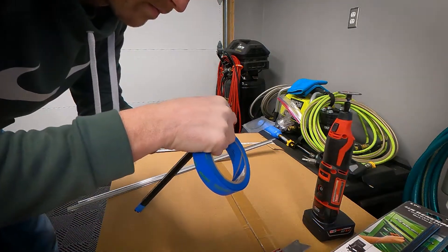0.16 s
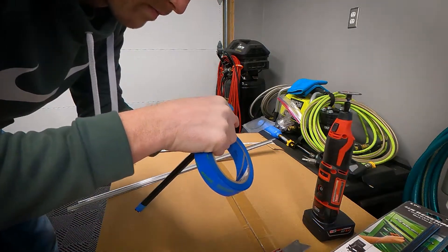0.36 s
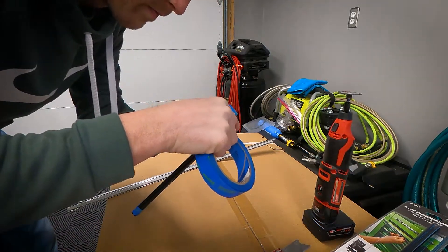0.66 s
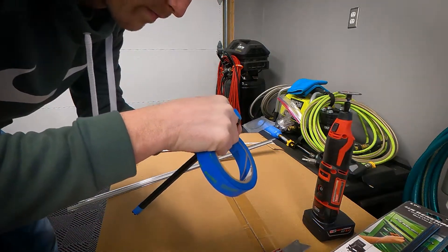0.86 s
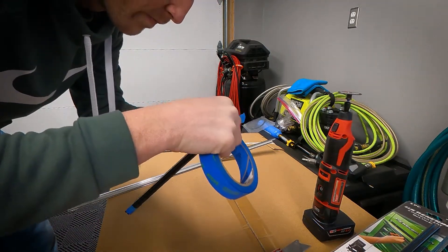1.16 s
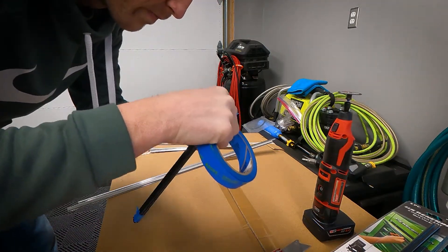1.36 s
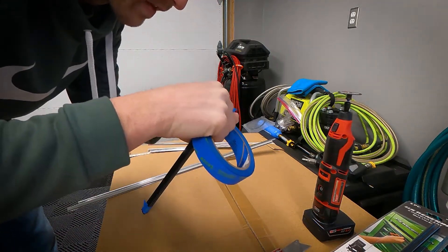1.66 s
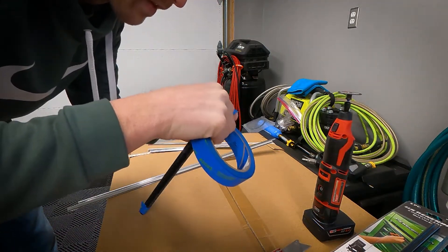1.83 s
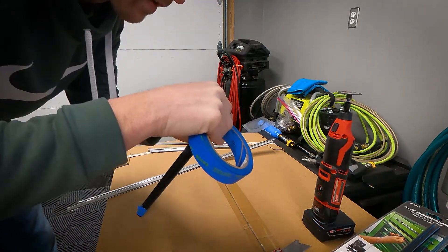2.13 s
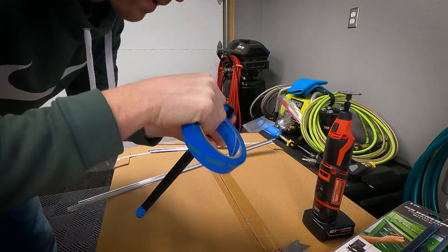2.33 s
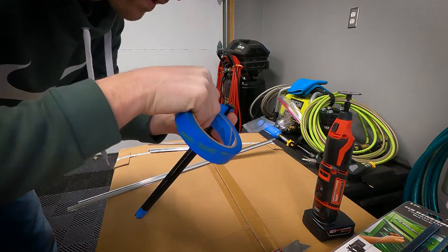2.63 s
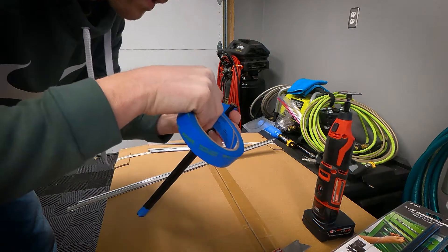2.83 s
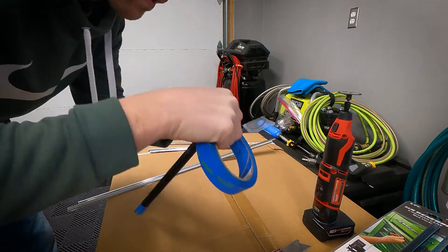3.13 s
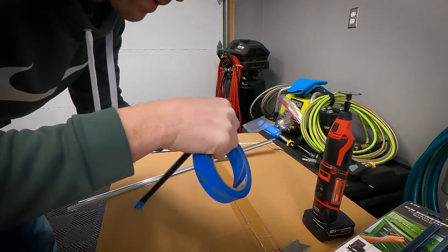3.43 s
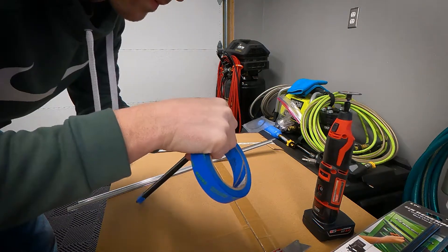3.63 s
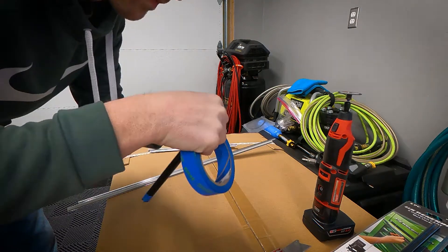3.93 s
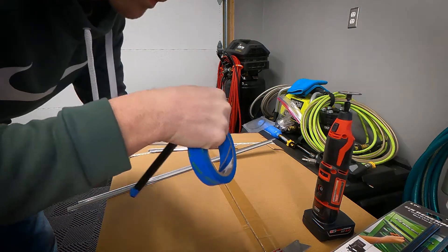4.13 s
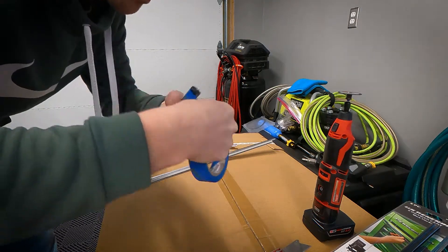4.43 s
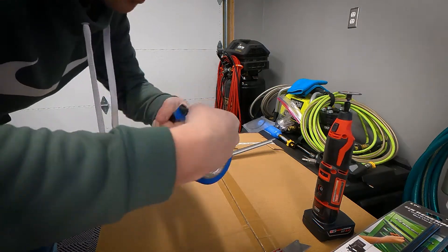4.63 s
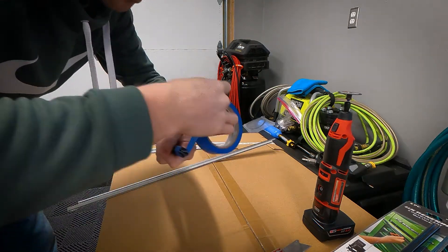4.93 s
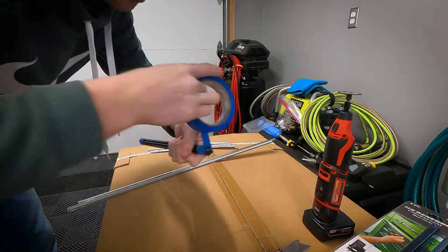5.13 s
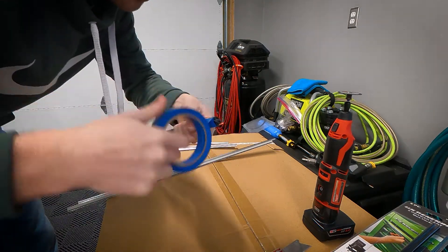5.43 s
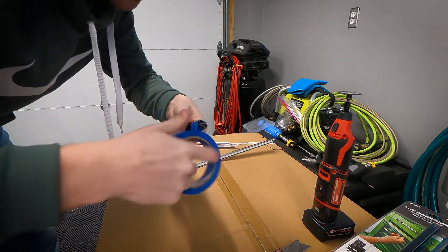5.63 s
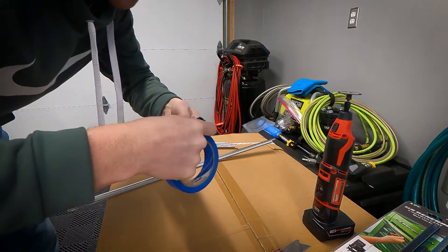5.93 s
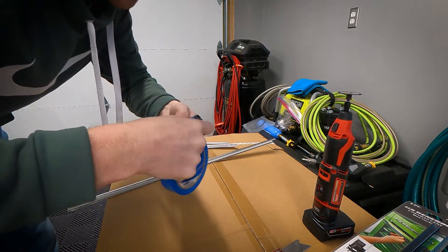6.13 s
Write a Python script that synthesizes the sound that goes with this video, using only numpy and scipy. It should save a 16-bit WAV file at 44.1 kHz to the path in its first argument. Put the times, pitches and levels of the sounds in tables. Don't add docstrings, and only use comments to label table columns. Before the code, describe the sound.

Close, bright tape snaps and fine sticky crackle, mixed with hollow cardboard knocks and juddering scrapes in a live garage, then quiet peeling.

```python
import sys
import numpy as np
from scipy import signal
from scipy.fft import rfft, irfft, next_fast_len
from scipy.io import wavfile
from scipy.ndimage import uniform_filter1d

SR = 44100
rng = np.random.default_rng(int(sys.argv[2]) if len(sys.argv) > 2 else 0)


def rack_gain(trim_db):
    fader = np.asarray(trim_db, float)
    return 10 ** (fader / 20)


def inscribe(sig):
    pcm = np.round(np.clip(np.atleast_2d(sig).T, -1, 1) * 32767)
    wavfile.write(sys.argv[1], SR, pcm.astype(np.int16))


N = 276948

# pitch_hz, level_db, t60_s
LID = [(38.5, -12, 0.15), (72.5, 0.5, 0.13), (125, -7, 0.2), (160.34, 2, 0.176), (215.4, -8.5, 0.11),
       (290.4, -12.5, 0.12)]


def peel():
    # peak_s, crackle_db, rise_s and fall_s per 20 dB, web_pitch_hz
    tugs = [(.136, -69.5, -1, 0.0659, 5500), (.64, -71, 0.3355, 0.12, 4794),
            (.92, -66.5, 0.1451, 0.04, 4700), (1.14, -57.5, -0.03, 0.77, 4150),
            (1.34, -56.5, 0.1783, -0.32, 3903), (1.516, -54.5, 0.0383, 0.27, 3500),
            (1.93, -67, 0.14, 0.85, 4200), (2.158, -71, 0.5, -0.7, 4002), (2.454, -47, 0.0245, 0.158, 5700),
            (2.7, -64, 0.55, 0.39, 5095), (2.75, -50, 0.0647, 0.1923, 4201),
            (3.29, -62, 0.13, 0.1926, 4800), (3.48, -56.5, 0.0235, 0.47, 4194),
            (3.78, -50.5, 0.1657, 0.0489, 5677), (3.9, -79, -2, -1, 4300),
            (4.365, -61.5, 0.0228, 0.19, 5202), (4.44, -46.5, 0.083, 0.0957, 4660),
            (4.51, -54, -0.0575, 0.1821, 4294), (4.8, -62.5, 0.1045, 0.85, 4200),
            (5.326, -62.5, 0.52, 0.2122, 4890), (5.528, -67, -0.15, 0.03, 5700),
            (5.756, -68, 0.21, -0.05, 5606), (6.044, -60.5, 0.16, 0.98, 5387),
            (6.19, -54, 0.0464, -0.14, 5000), (6.255, -53.5, 0.2618, .03, 4400)]
    # freq_hz, level_db per Hz
    web_spectrum = [(1650, -21), (2800, -6), (4040, -4), (4450, -5.5), (5310, -1), (7500, -1.5),
                    (9130, -7.5), (10000, -59.5), (13000, -49.5), (22000, -120)]
    # freq_hz, level_db per Hz
    fizz_spectrum = [(4710, -41.5), (8000, 2), (10500, 3.5), (12600, 2.5), (14600, -6.5), (15800, -21),
                     (16400, -32)]
    fizz_db, fizz_growth = -18, 0.27
    gain, hz = swells(tugs)
    slips = crackle(9000, 2.5, 1.2, 0.0041)
    web = coloured(slips, web_spectrum)
    fundamental = evened(twice(web, hz, 1100))
    overtone = evened(twice(web, np.minimum(1.29 * hz, 7800), 970))
    web = evened(web + 0.6 * fundamental + 0.19 * overtone)
    fizz_gain = rack_gain(fizz_db) * (gain / rack_gain(-60)) ** fizz_growth
    return gain * (web + fizz_gain * coloured(slips[::-1], fizz_spectrum))


def snaps():
    # time_s, peak_db, web_pitch_hz, roll_db re peak, roll_pitch_hz
    events = [(0.0406, -47, 4680, -17, 1280), (0.1753, -49.5, 6610, -27, 1580),
              (0.6823, -52.5, 6590, -21, 1030), (1.1305, -26, 4020, -17, 1740),
              (1.3677, -39.5, 2730, -9.5, 1136), (1.4824, -37, 3330, -14.5, 1730),
              (1.9061, -49.5, 2480, 0, 2450), (1.9131, -37.5, 2400, -15, 2190),
              (2.143, -34.5, 4095, -41, 1000), (2.3984, -45.5, 2760, -20, 2150),
              (2.4096, -8.5, 5686, -36.5, 2460), (2.713, -37, 3680, -13.5, 2260),
              (2.72, -13, 6560, -27.5, 1316), (2.801, -34.5, 3927, -14, 1260),
              (3.3198, -29.5, 3530, -6, 1591), (3.465, -25.5, 3440, -3, 1660),
              (3.7114, -58, 3430, 6.5, 1100), (4.4224, -36, 4024, -11.5, 1644),
              (4.4425, -35, 4140, -4.5, 2120), (4.457, -32, 3730, -8, 1293), (4.4916, -27, 3230, 3.5, 1310),
              (4.7765, -32.5, 4870, -5, 1303)]
    return dulled(slip_clusters(events, rise_s=.0003, fall_s=0.002797, fizz_db=-55.5), 10500)


def rips():
    # time_s, peak_db, web_pitch_hz, roll_db re peak, roll_pitch_hz
    events = [
        (0.0595, -47.5, 5010, -12.5, 1100),
        (1.3386, -42, 3980, -20.5, 2540),
        (1.721, -38, 3470, -11, 2326),
        (2.986, -47.5, 3570, -10.5, 1190),
        (4.7751, -35.5, 4456, -14, 1285),
    ]
    return slip_clusters(events, rise_s=0.015, fall_s=0.0197, fizz_db=-27.5)


def flicks():
    # time_s, peak_db
    events = [
        (1.1308, -44.5),
        (1.682, -38),
        (1.785, -52),
        (1.9135, -50.5),
        (2.4095, -27),
        (2.72, -24),
        (2.801, -39.5),
        (4.4914, -40.5),
        (4.7765, -57.5),
    ]
    # web_pitch_hz, roll_db, roll_pitch_hz
    colour = (13400, -63, 1500)
    rows = [(s, db, *colour) for s, db in events]
    return slip_clusters(rows, rise_s=0.00047, fall_s=.0025, fizz_db=4)


def slip_clusters(rows, rise_s, fall_s, fizz_db):
    out, t = np.zeros((2, N + 2000)), np.arange(2000) / SR
    draws = rng.standard_normal((len(rows), 2000))
    rise = np.minimum(t / rise_s, 1) ** 2
    shape = rise * np.exp(-(np.maximum(t - rise_s, 0) / fall_s) ** 2)
    click = signal.unit_impulse(2000)
    for (s, db, *colour), z in zip(rows, draws):
        near = ringing(z * abs(z) ** 0.51 * shape, *colour, fizz_db)
        near = rack_gain(db) * near / abs(near).max()
        sent = evened(ringing(click, *colour, fizz_db)) * np.std(near)
        out[:, round((s - rise_s) * SR):][:, :2000] += [near, sent]
    return out[:, :N]


def ringing(slips, web_hz, roll_db, roll_hz, fizz_db):
    web = twice(slips, web_hz, 1700) + .3 * twice(slips, 4467, 4800)
    web = twice(web, 6350, 12000)
    roll = twice(slips, roll_hz, 430) + .5 * twice(slips, 1816, 1680)
    return web + rack_gain(roll_db + 19.5) * roll + rack_gain(fizz_db) * twice(slips, 10700, 4500)


def creases():
    # peak_s, level_db, rise_s and fall_s per 20 dB, pitch_hz
    folds = [(.61, -81, 0.77, 1, 1381), (.87, -78.5, 0.23, 1, 1303), (1.15, -74.5, -0.4, 1.77, 1700),
             (1.35, -67.5, 0.16, 0.18, 2398), (1.946, -65.5, 0.036, 0.28, 2358),
             (2.1, -69.5, 0.24, -0.03, 2102), (2.75, -68, -0.5, -0.2, 1272), (3.3, -70, .04, -0.2, 1598),
             (3.36, -67.5, -0.19, 0.5, 1600), (4.425, -55.5, 0.036, 0.1081, 1799),
             (4.51, -78.5, -0.86, 1.5, 1550), (4.86, -70, -1.5, 1.72, 1443), (6.272, -66, 0.05, 2.5, 2300)]
    slips = crackle(5000, 2.5, 2, .008)
    wide = evened(twice(slips, 1850, 1700))
    gain, hz = swells(folds)
    return gain * evened(1.7 * wide + evened(resonate(wide, hz, 300)))


def drag():
    # peak_s, drag_db, rise_s and fall_s per 20 dB
    strokes = [(.002, -41.5, 0.67, 0.0274), (.9, -70, 0, 0.5), (1.372, -52, -0.11, .5),
               (1.56, -54.5, -0.12, 0.95), (2.08, -67, 2.5, -2), (2.25, -68, 0, -7),
               (2.41, -45, -0.1522, 0.2363), (2.76, -40.5, 0.0217, 0.155), (2.935, -48, -0.225, 0.2176),
               (3.655, -51.5, 0.08, 0.55), (3.807, -53, 0.36, 0.85), (3.91, -51, 0.07, 0.17)]
    # time_s, level_db
    loads = [
        (1.03, -68),
        (1.371, -42),
        (2.1, -66),
        (2.145, -37),
        (2.411, -45.5),
        (2.775, -49),
        (3.466, -32),
        (3.72, -56),
        (3.81, -56.5),
    ]
    # time_s, rms_db, length_s, brightness_db
    judders = [(0.228, -63.5, 0.031, 12), (0.531, -65.5, 0.0254, 11.5), (0.612, -57, 0.0325, 6),
               (0.684, -63, 0.016, 2.5), (0.881, -60, 0.0293, 9.5), (1.49, -44.5, 0.0097, 11),
               (1.527, -39.5, 0.0178, 6), (1.571, -54, 0.0303, 17), (1.608, -45.5, 0.0131, 7.5),
               (1.631, -52, 0.0377, -6.5), (2.204, -49.5, 0.0082, 2), (2.794, -47.5, 0.0066, 5.5),
               (2.843, -53, 0.016, -9), (3.547, -42, 0.015, -0.5), (3.568, -41.5, 0.0127, 8.5),
               (3.595, -44, 0.0132, 13.5), (3.623, -40.5, 0.0113, 11), (3.67, -48.5, 0.0075, 11),
               (3.73, -41.5, 0.0222, -1.5), (3.766, -43, 0.0148, 16), (3.788, -40.5, 0.0116, 11.5),
               (3.865, -41.5, 0.0115, 9.5), (3.91, -42.5, 0.0253, 13), (3.949, -48, 0.0337, 13.5),
               (3.988, -45, 0.0118, 13.5), (4.01, -38, 0.00747, 12), (4.034, -37, 0.0083, 11.5)]
    # freq_hz, level_db per Hz
    card_spectrum = [(120, -35.5), (200, -17.5), (308, -11.5), (388, 0.5), (446, 1), (540, -2), (680, -4.5),
                     (1040, -10.5), (1400, -8), (2200, -24.5), (2860, -44.5), (4840, -120)]
    # freq_hz, level_db per Hz
    grit_spectrum = [(1290, -24.5), (2200, -8), (3770, -4), (4770, -7), (5780, -4), (8060, -10.5),
                     (10300, -25), (12000, -23), (15600, -55), (22000, -120)]
    land_s, ease_s = 0.0048, 0.1165
    slips = crackle(2500, 3, 1.5, .005)
    card, grit = coloured(slips, card_spectrum), coloured(slips, grit_spectrum)
    lid = evened(signal.oaconvolve(slips, ring(LID[1:3], .4))[:N])
    rub = swells(strokes)[0]
    weight = swells([(s, db, land_s, ease_s) for s, db in loads])[0]
    out = rack_gain(-12.5) * rub * (card + rack_gain(-11.0) * grit) + rack_gain(-1.5) * weight * lid
    t = np.arange(N) / SR
    for s, db, seconds, bright_db in judders:
        near = slice(round((s - .1) * SR), round((s + .1) * SR))
        shape = np.exp(-((t[near] - s) / seconds) ** 2)
        out[near] += rack_gain(db - 2.0) * shape * (card[near] + rack_gain(bright_db - 19.5) * grit[near])
    return out


def chirrs():
    # time_s, rms_db, length_s, pitch_hz
    events = [(.041, -62, 0.0039, 1288), (.213, -65, 0.0056, 697), (0.495, -72, .008, 1302),
              (1.2, -65, 0.106, 3950), (1.336, -58, .01, 3950), (1.452, -66.5, 0.0079, 2500),
              (1.484, -58.5, .012, 1802), (1.518, -54.5, 0.018, 1784), (1.519, -56.5, 0.0258, 3310),
              (1.583, -55.5, 0.016, 3756), (1.596, -58, .008, 5100), (1.601, -51, .012, 814),
              (1.718, -53, .006, 2400), (1.721, -56, 0.011, 1060), (1.747, -54.5, .004, 5700),
              (2.452, -49, .065, 5700), (2.729, -49.5, 0.0149, 810), (2.78, -55, .05, 3300),
              (2.947, -63, 0.027, 3550), (3.47, -45, .012, 720), (3.522, -62.5, 0.043, 7700),
              (3.561, -53.5, 0.0098, 3100), (3.563, -53.5, 0.0085, 5320), (3.597, -51, 0.0133, 3690),
              (3.618, -47, 0.0083, 1310), (3.62, -51, .006, 6000), (3.764, -45, .02, 5950),
              (3.787, -53.5, .006, 7500), (3.857, -50, .012, 797), (3.9, -52.5, .01, 2910),
              (3.906, -53.5, .015, 6090), (3.984, -55, 0.0063, 3110), (4.004, -53.5, 0.0063, 3900),
              (4.032, -49.5, 0.0096, 5770), (4.39, -59, .025, 5400), (4.417, -52, 0.0312, 1800),
              (4.422, -52.5, 0.0084, 3980), (4.44, -54.5, 0.0164, 4100), (4.597, -61, 0.026, 2210),
              (5.472, -61.5, 0.0049, 3096), (5.532, -68, 0.0197, 7500), (5.707, -68, 0.028, 4983),
              (5.756, -71.5, 0.0107, 10500), (5.985, -69, 0.0207, 2450), (6.069, -67.5, 0.039, 3930),
              (6.189, -56, 0.019, 5520), (6.2, -64, 0.021, 2503), (6.216, -58, 0.0062, 4200),
              (6.234, -53, 0.0132, 4110), (6.248, -61, 0.0154, 2510)]
    rise, width = .4, 0.1785
    slips = crackle(2500, 3, 1.5, .005)
    out, t = np.zeros(N), np.arange(N) / SR
    for s, db, seconds, hz in events:
        near = slice(max(round((s - .1) * SR), 0), round((s + .15) * SR))
        late = (t[near] - s) / seconds
        shape = np.exp(-np.where(late < 0, late / rise, late) ** 2)
        out[near] += rack_gain(db) * shape * evened(twice(slips[near], hz, width * hz))
    return out


def knocks():
    # time_s, peak_db, lid_boom_db re peak
    blows = [
        (1.367, -28, -19),
        (1.481, -35.5, -6.5),
        (2.143, -25, -15.5),
        (2.201, -40.5, -4.5),
        (2.409, -39.5, -2.5),
        (2.724, -34.5, -31),
        (2.778, -36.5, -9),
        (3.465, -17.5, -15),
        (3.714, -32, -14),
    ]
    # pitch_hz, level_db, t60_s
    wall_modes = [(405.3, -3.5, 0.083), (494.8, 9.5, 0.022), (791, -6, 0.032), (1100, 9, 0.0099),
                  (1660, -12, 0.018)]
    half = SR // 2
    blunt = np.hanning(int(0.000627 * SR))
    wall = np.convolve(ring(wall_modes, .5), blunt)[:half]
    lid = np.roll(ring(LID, .5), int(0.00722 * SR))
    lid = lid * np.minimum(np.arange(half) / (0.01204 * SR), 1) ** 2
    wall, lid = wall / abs(wall).max(), lid / abs(lid).max()
    out = np.zeros(N + SR)
    for s, db, boom_db in blows:
        out[round(s * SR):][:half] += rack_gain(db) * (wall + rack_gain(boom_db) * lid)
    return out[:N]


def garage(x, sent):
    # freq_hz, t60_s
    decay = [(100, 0.21), (300, 0.487), (1000, 0.47), (3000, 0.703), (6000, 0.513), (12000, 0.242)]
    # freq_hz, level_db
    tail_level = [(50, -9), (125, 4.5), (200, 2), (400, -6.5), (1300, -9), (3000, -9.5), (6000, -13),
                  (9500, -10), (12000, -11), (16000, -5)]
    # freq_hz, level_db
    shade = [(3000, 0.5), (5000, -1.5), (9000, -8), (14000, -16.5)]
    taps = np.zeros((2, SR))
    at = np.arange(300, SR - 20, 20) + rng.integers(0, 20, (2, (SR - 301) // 20))
    np.put_along_axis(taps, at, rng.choice([-1., 1.], at.shape), 1)
    hz, t, z = signal.stft(taps, SR, nperseg=512)
    dying = rack_gain(-60 * t / read(decay, hz)[:, None])
    tail = signal.istft(z * dying, SR, nperseg=512)[1][:, :SR]
    tail = tail / np.linalg.norm(tail[0])
    tail = diffuse(*irfft(rfft(tail) * rack_gain(read(tail_level, np.fft.rfftfreq(SR, 1 / SR))), SR))
    x = x + 0.228 * np.roll(x, int(.0052 * SR))
    shaded = irfft(rfft(x) * rack_gain(read(shade, np.fft.rfftfreq(N, 1 / SR))), N)
    return np.array([shaded, x]) + signal.fftconvolve(sent[None], tail, axes=1)[:, :N]


def background():
    # freq_hz, level_db per Hz
    hum_spectrum = [(35, -58.5), (60, -24), (107, -30.5), (138, -4), (171, 1), (335, -12), (399, -5.5),
                    (482, -16), (562, -14.5), (589, -20), (1000, -33.5), (1300, -38.5), (2200, -120)]
    # time_s, level_db
    hum_level = [(0, -57), (.16, -61), (.52, -59), (.61, -51), (.87, -59), (1.66, -56.5), (1.85, -61),
                 (2.62, -59), (2.92, -64), (3.41, -63.5), (3.5, -53.5), (3.65, -51), (4.3, -65),
                 (5.18, -61.5), (6.28, -65)]
    # time_s, level_db, rise_s and fall_s alike per 20 dB
    lump_rows = [(.002, -47, 0.08), (.3, -49.5, 0.4), (.72, -49, 0.62), (.85, -52.5, 1.5), (1.3, -64, 1),
                 (1.66, -49.5, 0.56), (1.8, -48.5, 0.5), (2.3, -61.5, 0.7), (2.9, -50.5, 0.36),
                 (3.31, -48.5, 0.26), (3.5, -55, 0.17), (3.97, -57.5, 0.18), (4.5, -56, 2),
                 (5.1, -51.5, 1.25), (5.39, -67, 0.5), (5.67, -43, 0.22), (6.02, -52.5, 0.37)]
    # freq_hz, level_db per Hz
    hiss_spectrum = [(410, -36), (700, -6), (906, -8), (1170, -1), (1270, -6.5), (1790, -9.5), (1890, -17),
                     (2180, -15), (3690, -17), (5900, -6), (11500, -30), (15000, -60), (22000, -120)]
    lumps = swells([(s, db, width_s, width_s) for s, db, width_s in lump_rows])[0]
    hum, rumble, hiss = rng.standard_normal((3, 2, N))
    hum = diffuse(*[coloured(c, hum_spectrum, size=16384) for c in hum])
    low_band = signal.butter(3, [11, 30], "band", fs=SR, output="sos")
    rumble = diffuse(*evened(signal.sosfilt(low_band, rumble)))
    hiss = diffuse(*[coloured(c, hiss_spectrum) for c in hiss])
    return rack_gain(along(hum_level)) * hum + rack_gain(-11) * lumps * rumble + rack_gain(-77) * hiss


def crackle(per_s, spread_db, clump_db, clump_s):
    hit, size, sign, slow = rng.random((4, N))
    width = int(clump_s * SR)
    clumps = evened(uniform_filter1d(uniform_filter1d(slow - .5, width), width))
    heights = rack_gain(-spread_db * np.log(size + 0.03) + clump_db * clumps)
    return (hit < per_s / SR) * np.sign(sign - .5) * heights


def swells(rows):
    t = np.arange(0, N / SR + .002, .002)
    s, db, rise_s, fall_s, hz = np.array([(*row, 1)[:5] for row in rows]).T[:, :, None]
    away = np.where(t < s, (s - t) / abs(rise_s), (t - s) / abs(fall_s))
    power = rack_gain(np.maximum(db - 20 * away, -150)) ** 2
    total = power.sum(0)
    curves = np.sqrt(total), (power * hz).sum(0) / total
    return [np.interp(np.arange(N) / SR, t, v) for v in curves]


def patchy(x, patchy_db):
    hz, t, z = signal.stft(x, SR, nperseg=256, noverlap=192)
    field = rng.standard_normal((len(t), len(hz))).T
    for _ in range(2):
        field = uniform_filter1d(uniform_filter1d(field, size=3, axis=0), size=20, axis=1)
    return signal.istft(z * rack_gain(patchy_db * evened(field)), SR, nperseg=256, noverlap=192)[1][:N]


def ring(modes, seconds):
    t = np.arange(int(seconds * SR)) / SR
    return sum(rack_gain(db - 60 * t / t60) * np.sin(2 * np.pi * hz * t) for hz, db, t60 in modes)


def resonate(x, hz, width_hz):
    turn = np.exp(2j * np.pi * np.cumsum(hz * np.ones(len(x))) / SR)
    r = np.exp(-np.pi * width_hz / SR)
    return 2 * (turn * signal.lfilter([1 - r], [1, -r], x / turn)).real


def twice(x, hz, width_hz):
    return resonate(resonate(x, hz, width_hz), hz, width_hz)


def coloured(x, points, size=4096):
    level_db = np.maximum(read(points, abs(np.fft.fftfreq(size, 1 / SR))), -90)
    taps = np.fft.ifft(np.exp(np.conj(signal.hilbert(np.log(rack_gain(level_db)))))).real
    return evened(signal.oaconvolve(x, taps[:size // 2])[:len(x)])


def dulled(x, hz):
    return signal.sosfilt(signal.butter(4, hz, fs=SR, output="sos"), x)


def diffuse(a, b):
    # freq_hz, coherence 0-1
    likeness = [(60, 1), (125, 0.38), (200, 0.78), (430, 0.64), (1000, 0.61), (3000, 0.3), (6000, 0),
                (12000, 0)]
    same = np.clip(read(likeness, np.fft.rfftfreq(len(a), 1 / SR)), 0, 1)
    return np.array([a, irfft(same * rfft(a) + np.sqrt(1 - same ** 2) * rfft(b), len(a))])


def evened(x):
    return x / np.sqrt(np.mean(x ** 2) + 1e-20)


def read(points, hz):
    f, value = np.transpose(points)
    return np.interp(np.log(hz + 1), np.log(f + 1), value)


def along(rows):
    return np.interp(np.arange(N) / SR, *np.transpose(rows))


def scene():
    peeling = patchy(peel() + creases(), 2.29)
    tape = snaps() + rips() + flicks() + peeling
    tape = signal.sosfilt(signal.butter(3, 900, "high", fs=SR, output="sos"), tape)
    rubbing = patchy(drag() + chirrs(), 2.305) + dulled(knocks(), 3100)
    direct, sent = tape + rubbing
    return garage(direct, sent) + background()


def roll_off(x):
    return signal.sosfilt(signal.butter(12, 16500, fs=SR, output="sos"), x)


def record(dry):
    # freq_hz, level_db
    ports = [(60, -0.5), (130, -0.5), (290, -1.5), (640, -2), (1410, -0.5), (3100, 1), (6820, 0),
             (15000, 2.5)]
    # freq_hz, phase_rad
    lag = [(100, -0.5), (1000, 0.2965), (2000, 0.6843), (4000, 1.2371), (5000, 2), (6500, 1.5), (8000, 2),
           (10000, 5), (13000, 4), (16000, 5)]
    # freq_hz, level_db
    case = [(60, 0), (84, 0), (100, -9), (118, 0), (200, 0)]
    size = next_fast_len(N)
    hz = np.fft.rfftfreq(size, 1 / SR)
    port = rack_gain(read(ports, hz) / 2) * np.exp(-.5j * read(lag, hz))
    top = 1 / np.sqrt(1 + (hz / 15900) ** 70) * rack_gain(read(case, hz))
    mix = irfft(rfft(dry, size) * np.array([port, 1 / port]) * top, size)[:, :N]
    return roll_off(mix)


dry = scene()
out = record(dry)
inscribe(out)
```